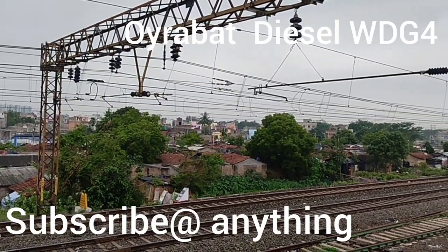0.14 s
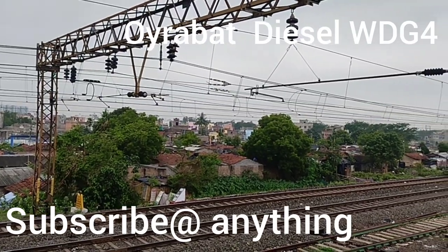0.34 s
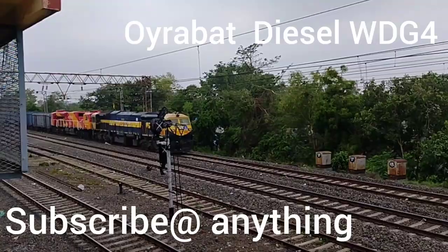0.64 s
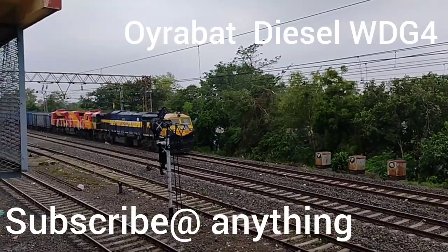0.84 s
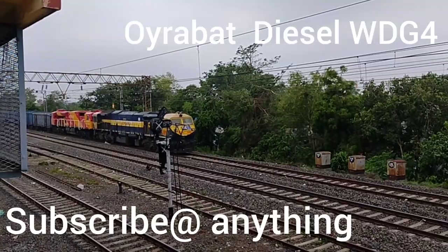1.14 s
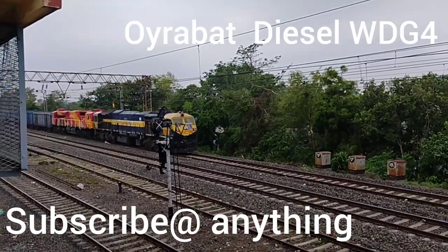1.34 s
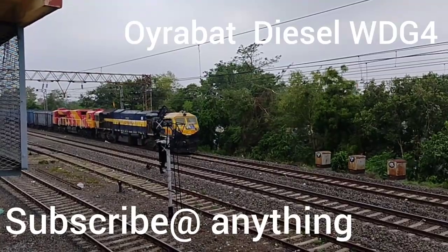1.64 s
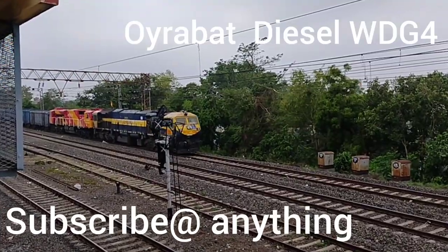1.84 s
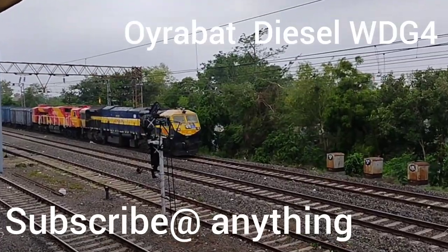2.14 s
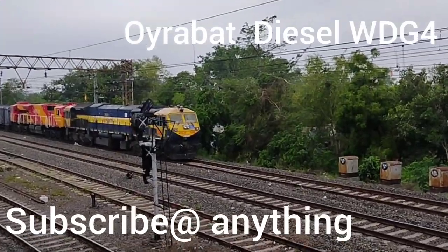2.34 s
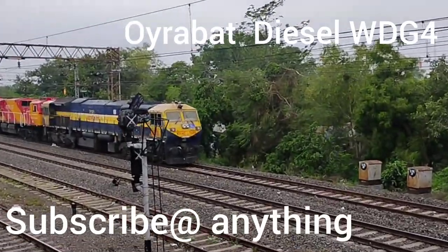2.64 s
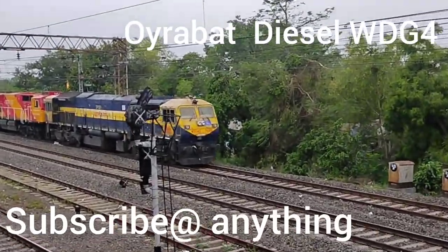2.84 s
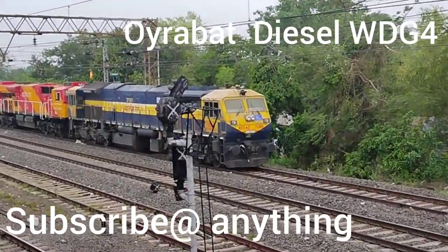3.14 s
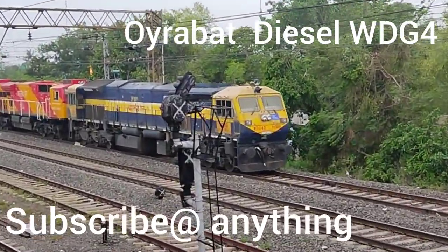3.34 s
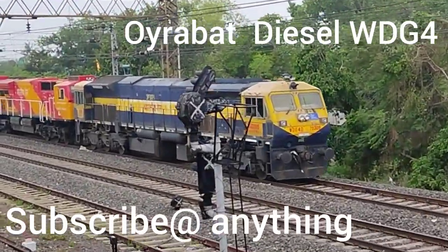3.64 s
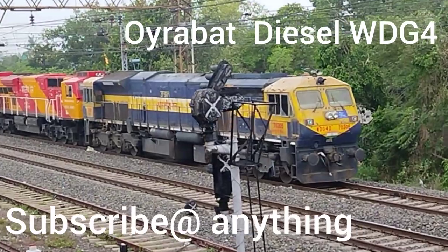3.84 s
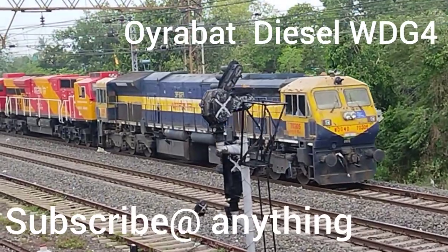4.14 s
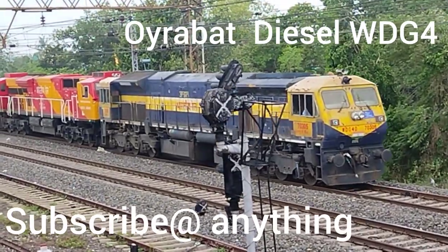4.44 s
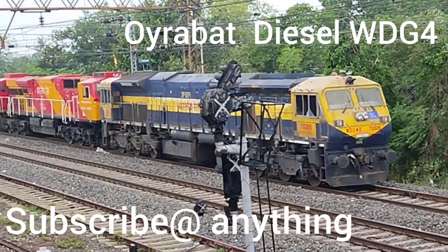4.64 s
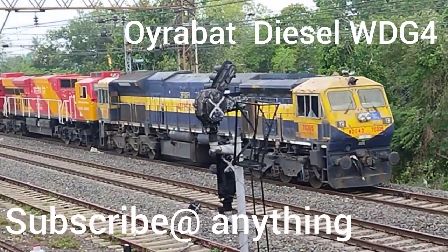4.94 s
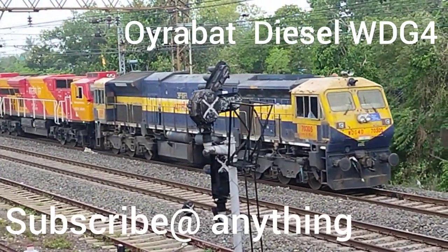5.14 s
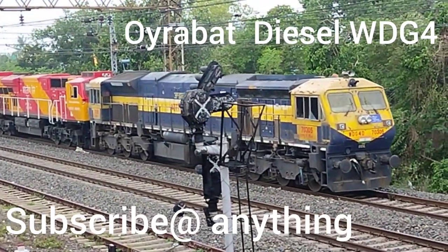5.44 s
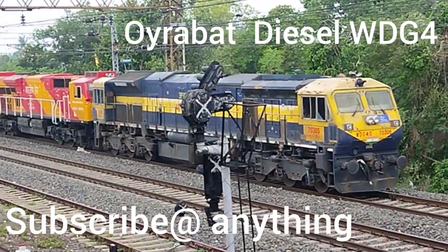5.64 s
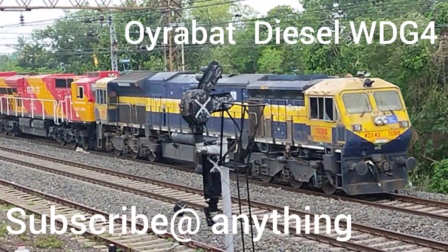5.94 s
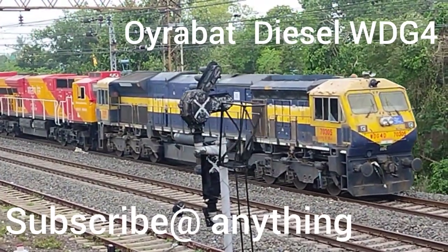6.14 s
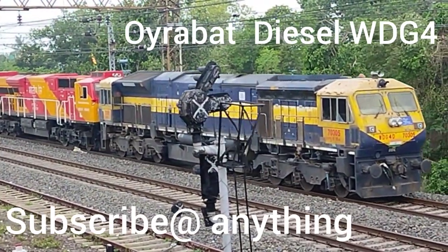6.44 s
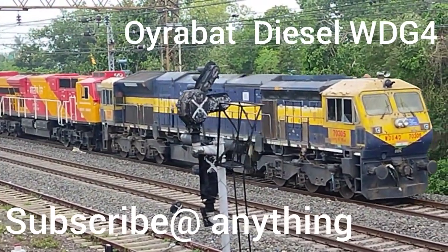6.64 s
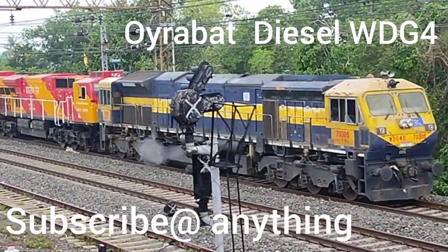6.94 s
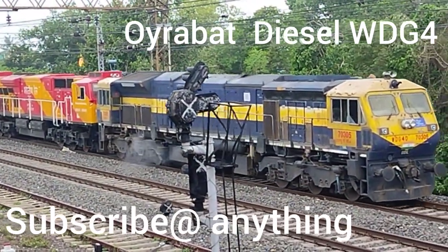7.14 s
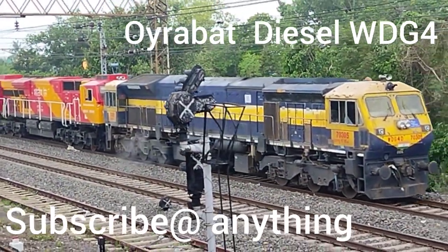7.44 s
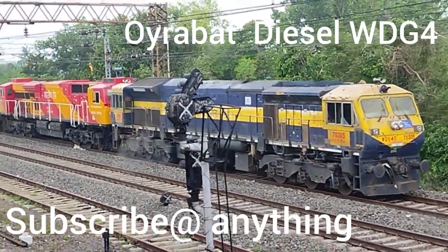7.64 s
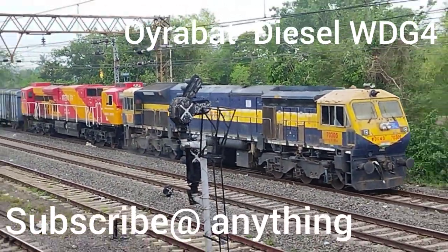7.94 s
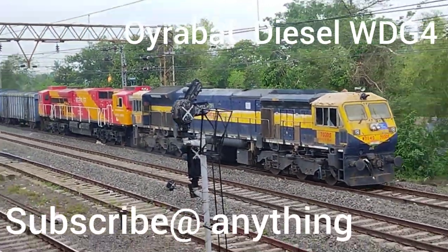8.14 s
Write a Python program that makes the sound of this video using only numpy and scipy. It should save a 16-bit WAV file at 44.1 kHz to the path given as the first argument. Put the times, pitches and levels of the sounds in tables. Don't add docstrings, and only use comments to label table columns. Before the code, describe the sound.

Outdoor railway yard captured on a phone in stereo. Cicadas ring, mostly to the right, then cut to a heavy diesel drone that quickly fades up. The steady pulsing rumble, rough exhaust, airy roar and piercing thin whistle grow slightly stronger as the train approaches. A mild air hiss comes early, ringing puffs and tiny peeps in the middle, and two bright strong blow-offs near the end.

```python
import sys
import numpy as np
from scipy import signal
from scipy.fft import rfft, irfft, next_fast_len
from scipy.io import wavfile
from scipy.ndimage import uniform_filter1d

SR = 44100
rng = np.random.default_rng(int(sys.argv[2]) if len(sys.argv) > 2 else 0)


def magnitude_from_level(level_db):
    exponent = np.asarray(level_db, float) / 20
    return 10 ** exponent


def waveform_to_disk(signal):
    frames = np.transpose(np.atleast_2d(signal))
    scaled = np.clip(frames, -1, 1) * 32767
    samples = np.round(scaled).astype(np.int16)
    wavfile.write(sys.argv[1], SR, samples)


N = 365181
SIZE = next_fast_len(N)
TIME, HZ = np.arange(N) / SR, np.fft.rfftfreq(SIZE, 1 / SR)
CUT_S, RETURN_S = 0.463, 0.55
MIDDLE_S = 4.5
FIRINGS, TEETH = 8, 79

# (time [s], pitch [Hz])
GEAR_MESH = [(0, 642.7), (3, 642.5), (6.5, 642.2), (7.5, 641.3), (8.3, 640.6)]
# (multiple of the engine cycle, level at MIDDLE_S [dB], change [dB/s])
EXHAUST_LINES = [(3, -52.5, -2.0), (4, -44.5, 0.0), (6, -50.0, -0.4), (7, -41.0, 0.9), (8, -30.5, 0.0),
                 (9, -38.5, -0.6), (10, -42.0, 1.0), (11, -39.0, 0.3), (12, -42.0, 0.7), (13, -30.5, 1.1),
                 (14, -33.5, -0.0), (15, -42.5, 0.6), (16, -35.5, 0.5), (17, -38.5, 1.9), (18, -48.0, -0.1),
                 (20, -52.0, 1.4), (21, -40.5, -0.1), (23, -51.5, 1.3), (24, -39.5, -0.4),
                 (25, -51.0, -0.5), (26, -53.5, -2.0), (27, -49.0, 0.5), (28, -58.5, -0.5),
                 (29, -48.5, -0.8), (30, -50.0, 2.0), (32, -50.0, -1.1), (34, -56.0, 1.2), (36, -52.5, 0.4)]
# (multiple of the engine cycle, level at MIDDLE_S [dB], change [dB/s])
GEAR_LINES = [(70, -52.5, 0.5), (79, -37.5, -0.0), (80, -46.5, -0.1), (81, -49.5, 2.0), (82, -50.5, -1.4),
              (83, -50.0, -0.9), (84, -51.5, 2.0), (85, -51.5, -0.6), (86, -50.5, 0.5), (87, -48.0, -0.0),
              (88, -53.0, -2.0), (89, -55.5, -2.0), (90, -55.0, -2.0), (91, -54.5, 1.5), (94, -51.5, -1.1),
              (96, -48.0, -1.3)]
# (time [s], nearness [dB], cooling air flow [dB], left over right [dB])
APPROACH = [(.6, -1, 0.5, 6), (1.1, -1, 1, 3), (2.5, 0, 0, 1.5), (3.3, 0.5, -1, 2), (4.1, 0.5, -.5, -3.5),
            (5.8, 0, -1, -4), (6.9, 1, 2, -6), (7.5, 1.5, 2.5, 0), (8.28, 2.5, 4, -5.5)]
# (frequency [Hz], level [dB])
RUMBLE_COLOUR = [(15, -2), (25, -8.5), (50, 2.5), (110, -7.5), (150, -9.5), (250, -5), (340, -7.5),
                 (480, -14.5), (600, -15), (900, -44.5)]
# (frequency [Hz], width [Hz], level [dB])
PANELS = [(683, 181, -0.5), (865, 47, -7.5), (1382, 315, -10), (2102, 350, -14)]
# (frequency [Hz], level [dB])
RUSH_COLOUR = [(300, 8.5), (1000, -13.5), (2600, 5.5), (3400, 3.5), (4500, 0.5), (6000, -3.5), (8000, -6.5),
               (10000, -31), (14000, -60)]
# (frequency [Hz], level [dB])
LEAK_COLOUR = [(5000, -22), (7000, 0.5), (8500, -1.5), (10000, -4.5), (12700, -18), (13600, -14),
               (14400, -2), (14800, -29), (15100, -44)]
# (frequency [Hz], width [Hz], level [dB])
FUZZY_TONES = [(20.9, 1, -48), (147, 0.85, -43), (295.6, 1.55, -52), (760, 3.9, -46.5), (919, 4.7, -52),
               (921, 6.2, -53.5), (1282, 24, -50), (1900, 23, -56.5), (3240, 60, -64), (4300, 89, -58),
               (3940, 26, -58), (14000, 300, -67)]
# (time [s], level [dB])
BLOWER_LOAD = [(.6, -60), (1.2, -55.5), (2, -55), (2.45, -63), (2.9, -68), (4.1, -63.5), (6.2, -59.5),
               (8.28, -57)]
# (time [s], pitch [Hz], level [dB])
WHEEL_TONE = [(3.8, 39.8, -60), (4.3, 41.74, -51), (5.5, 43.6, -44), (6.5, 47.4, -42), (7.5, 48.8, -60),
              (8.3, 51, -50)]
# (start [s], opening [s], hold [s], hiss [dB], nozzle ring [dB])
BLOW_OFFS = [
    (2.352, 0.04, 0.16, -43, -50),
    (3.714, .025, .04, -56, -42),
    (4.568, .02, 0.09, -58, -46),
    (6.815, 0.0073, .014, -38, -38.5),
    (6.852, .075, 0.1, -30, -27),
    (7.584, 0.23, 0.16, -31, -32.5),
]
# (frequency [Hz], level [dB])
JET_COLOUR = [(700, -36), (1500, -33), (2500, -3.5), (4000, -10), (6000, -3), (7500, 1.5), (9200, 5.5),
              (11000, 0), (13000, -4.5), (15500, -8), (15900, -14), (16200, -50)]
# (frequency [Hz], width [Hz], level [dB])
NOZZLE_RING = [(1390, 310, -8), (2100, 270, 1), (3650, 1900, -5.5), (5030, 470, -1.5), (7860, 1900, -5)]
# (start [s], length [s], first pitch [Hz], last pitch [Hz], level [dB])
SQUEAKS = [
    (3.656, .04, 4650, 4620, -58),
    (3.83, .027, 4680, 4680, -54),
    (4.35, .27, 4160, 4330, -59),
    (4.63, 0.12, 4700, 4740, -58),
    (5.193, .19, 4540, 4270, -62),
    (4.95, 0.5, 8450, 8570, -58),
]
# (start [s], length [s], first pitch [Hz], last pitch [Hz], level [dB])
NEAR_BIRD = [
    (3.875, .081, 4150, 4180, -47.5),
]
# (start [s], length [s], first pitch [Hz], last pitch [Hz], level [dB])
BREATHY_CALLS = [
    (3.03, .13, 3920, 3650, -53),
    (4.753, .51, 8800, 8650, -57),
]
# (frequency [Hz], width [Hz], level [dB])
CICADA_BODY = [(5280, 480, 0), (6450, 560, -4.5), (7300, 250, -15), (8670, 250, -23), (9620, 200, -22),
               (10550, 200, -27)]
# (frequency [Hz], level [dB])
YARD_COLOUR = [(12, -37), (20, -7), (60, 0.5), (96, -4.5), (129, -3.5), (321, -11.5), (360, -8.5),
               (542, -21.5), (1000, -20.5), (1100, -29), (1730, -25), (1940, -33.5), (4600, -41),
               (5980, -62), (10100, -120)]
# (frequency [Hz], level [dB])
INSECT_COLOUR = [(7000, -5.5), (8000, -4), (8700, -3), (9200, -14), (9700, -1), (10200, -12), (10700, -8),
                 (11500, -10.5), (13500, -11.5), (15300, -10), (15800, -12), (16200, -48)]
# (frequency [Hz], colour [dB], likeness [0-1], lag [radians])
PORT_DIFFERENCE = [(25, .3, .975, .02), (130, .5, .996, .05), (350, .8, .93, .12), (700, -2.6, .92, .25),
                   (1050, 2, .45, .4), (1350, -1, .72, .4), (2100, 8, .78, 1.1), (2800, 1, .45, 3),
                   (4000, 4, .3, 8), (5000, 1, .5, 6.6), (7600, 1, .5, 9.2), (9300, -13, .1, 11),
                   (12000, -9, .1, 14), (15000, -2, .3, 16)]
# (frequency [Hz], level [dB])
SILENT_BELOW_NEAR_TRAIN = [(2000, -110), (4300, -87), (8000, -86), (9000, -87), (13000, -85), (14500, -88),
                           (15100, -75), (16000, -76)]
# (frequency [Hz], level [dB])
SILENT_BELOW_NEAR_CICADAS = [(1500, -110), (2800, -81), (4700, -79), (5000, -82), (9000, -83), (12500, -81),
                             (14500, -83), (16000, -84)]


def evened(x):
    return x / np.sqrt(np.mean(x ** 2) + 1e-20)


def read(table, column, hz=HZ):
    rows = np.array(table)
    return np.interp(np.log(hz + 1), np.log(rows[:, 0] + 1), rows[:, column])


def curve(table, column):
    rows = np.array(table)
    return np.interp(TIME, rows[:, 0], rows[:, column])


def bands_db(peaks):
    return 20 * np.log10(sum(magnitude_from_level(db) / (1 + (2 * (HZ - hz) / width) ** 2) for hz, width, db in peaks))


def noise(shape_db):
    spectrum = rfft(rng.standard_normal((2, SIZE))) * magnitude_from_level(shape_db)
    return evened(irfft(spectrum, SIZE)[:, :N])


def drift(hz):
    z = rng.standard_normal((int(20 * N / SR), 2)) @ [1, 1j]
    f = np.arange(len(z)) * SR / N
    slow = irfft(z * np.exp(-(f / hz) ** 2) * (f > 0), N // 64 + 2)
    return evened(slow.repeat(64)[:N])


def resonate(x, hz, width):
    turn = np.exp(2j * np.pi * np.cumsum(hz * np.ones(x.shape[-1])) / SR)
    r = np.exp(-np.pi * width / SR)
    smooth = signal.lfilter([(1 - r) ** 2], [1, -2 * r, r * r], x / turn + 1e-18)
    return 2 * (turn * smooth).real


def drone(hz, db, waver_db):
    phase = 2 * np.pi * np.cumsum(hz) / SR
    return np.sqrt(2) * magnitude_from_level(db + waver_db * drift(hz=19)) * np.cos(phase)


def follow(db, near, air):
    return db + near * curve(APPROACH, column=1) + air * curve(APPROACH, column=2)


def settle():
    late_db, settle_s = -6, 0.03
    return magnitude_from_level(late_db * np.exp(-np.maximum(TIME - RETURN_S, 0) / settle_s))


def cycle():
    return 2 * np.pi * np.cumsum(curve(GEAR_MESH, column=1)) / TEETH / SR


def hum(lines, waver_db, spread):
    turn = cycle()
    since = TIME - MIDDLE_S
    slip_hz, in_step_s, twin_db, twin_change = 0.19, 1.46, -8.5, -0.55
    slip = 2 * np.pi * slip_hz * (TIME - in_step_s)
    beat = 1 + magnitude_from_level(twin_db + twin_change * since) * np.exp(-1j * slip)
    out = np.zeros(N, complex)
    for multiple, db, change in lines:
        phase = multiple * turn + spread * multiple ** 2
        line = magnitude_from_level(db + change * since) * np.exp(1j * phase)
        out += line * beat if multiple == FIRINGS else line
    out *= np.sqrt(2) * magnitude_from_level(waver_db * drift(hz=1.2))
    return np.array([out.real, out.imag])


def roar():
    firing = np.cos(FIRINGS * cycle())
    rumble_db = follow(-31.5, near=0.22, air=0.4) + 0.6 * drift(hz=5.2)
    clatter_db = follow(-33.5, near=1.06, air=0.01) + 0.35 * drift(hz=6.9)
    rush_db = follow(-41.5, near=0.01, air=1.26) + 0.85 * drift(hz=8)
    leak_db = follow(-47, near=-0.99, air=2.05) + 1.4 * drift(hz=3)
    rumble = noise(read(RUMBLE_COLOUR, column=1)) * magnitude_from_level(rumble_db)
    clatter = noise(bands_db(PANELS)) * (1 + 0.029 * firing) * magnitude_from_level(clatter_db)
    rush = noise(read(RUSH_COLOUR, column=1)) * (1 + 0.047 * firing) * magnitude_from_level(rush_db)
    leak = noise(read(LEAK_COLOUR, column=1)) * magnitude_from_level(leak_db)
    return rumble * settle() + clatter + rush + leak


def turbo():
    whistle_hz = 7197
    firing = FIRINGS * cycle()
    phase = 2 * np.pi * np.cumsum(whistle_hz + 5 * drift(hz=9)) / SR + 0.5 * np.sin(firing)
    swell = (1 - 0.1 * np.cos(firing)) * magnitude_from_level(2.1 * drift(hz=23))
    right_phase = phase + 2.74 + 0.87 * drift(hz=4.8)
    tone = swell * np.array([np.cos(phase), np.cos(right_phase)])
    skirt = evened(resonate(rng.standard_normal((2, N)), whistle_hz - 30, 200))
    side = curve(APPROACH, column=3) / 2
    level_db = follow(-42.5, near=0.54, air=0.62) + np.array([side, -side])
    return (evened(tone) + 0.9 * skirt) * magnitude_from_level(level_db)


def whines():
    hiss = rng.standard_normal((2, N))
    return sum(magnitude_from_level(db - 1) * evened(resonate(hiss, hz, width)) for hz, width, db in FUZZY_TONES)


def blower():
    return drone(4616 + 4 * drift(hz=1.43), curve(BLOWER_LOAD, column=1), waver_db=3.0)


def wheels():
    return drone(curve(WHEEL_TONE, column=1), curve(WHEEL_TONE, column=2), waver_db=2.5)


def valves():
    crack_db, shut_db = -15, -3.5
    tail_far, tail_near = 55, 127
    ring_fade_db = 4.8
    sizzle, ring = noise(read(JET_COLOUR, column=1)), noise(bands_db(NOZZLE_RING))
    out = np.zeros((2, N))
    for start, opening, hold, hiss_db, ring_db in BLOW_OFFS:
        t = TIME - start
        after = np.maximum(t - opening - hold, 0)
        tail = tail_far + (tail_near - tail_far) * start * SR / N
        flow_db = crack_db * np.clip(1 - t / opening, 0, 1)
        flow_db += shut_db * np.minimum(after / 0.025, 1) - tail * after
        fade_db = ring_fade_db * np.clip(t - opening, 0, hold) / max(opening, 0.05)
        jet = magnitude_from_level(hiss_db + 6.0) * sizzle + magnitude_from_level(ring_db - fade_db) * ring
        out += np.clip(t / 0.008, 0, 1) * magnitude_from_level(flow_db) * jet
    return out * magnitude_from_level(0.7 * drift(hz=30))


def chirps(rows, width_hz):
    out = np.zeros((2, N))
    for start, length, start_hz, end_hz, db in rows:
        count, first = round(length * SR), round(start * SR)
        glide = np.linspace(start_hz, end_hz, count)
        fuzz = evened(resonate(rng.standard_normal((2, count)), glide, width_hz))
        clear = 60 / width_hz * np.cos(2 * np.pi * np.cumsum(glide) / SR)
        swell = signal.windows.tukey(count, 0.4)
        out[:, first:first + count] += magnitude_from_level(db + 4.5) * evened(fuzz + clear) * swell
    return out


def cicada():
    rib_count, buckles_per_s = 8, 53.6
    slowing, sag = 0.04, 0.01
    count = round(CUT_S * SR)
    rate = buckles_per_s * (1 + 0.0033 * drift(hz=5.4)[:count])
    stroke = np.cumsum(rate) / SR % 1
    ribs = 2 * np.pi * rib_count * (stroke + slowing * stroke * (1 - stroke))
    snaps = evened(sum(np.cos(k * ribs) for k in range(9, 27)))
    others = 1.15 * rng.standard_normal((2, count))
    drive = snaps * (1 + 0.2 * np.cos(2 * np.pi * stroke)) + others
    pitch = 1 + sag * (0.5 - stroke)
    body = sum(magnitude_from_level(db) * resonate(drive, hz * pitch, width) for hz, width, db in CICADA_BODY)
    low_edge = signal.ellip(6, 1, 40, 4830, "high", fs=SR, output="sos")
    body = signal.sosfilt(low_edge, body)
    return magnitude_from_level(-34 + np.array([[-7.5], [4.5]])) * evened(body)


def yard():
    near, far = noise(read(YARD_COLOUR, column=1))
    town = magnitude_from_level(-37.5) * np.array([near + 0.4 * far, near - 0.3 * far])
    insects = magnitude_from_level(-47.5) * noise(read(INSECT_COLOUR, column=1))
    return (town + insects)[:, :round(CUT_S * SR)]


def ports(pair):
    direct, scattered = rfft(pair, SIZE)
    same = np.clip(read(PORT_DIFFERENCE, column=2), 0, 1)
    late = direct * np.exp(-1j * read(PORT_DIFFERENCE, column=3))
    right = same * late + np.sqrt(1 - same ** 2) * scattered
    return np.array([pair[0], irfft(right * magnitude_from_level(read(PORT_DIFFERENCE, column=1)), SIZE)[:N]])


def scene():
    low = (hum(EXHAUST_LINES, waver_db=0.35, spread=1.4) + wheels()) * settle()
    tones = hum(GEAR_LINES, waver_db=0.4, spread=1.3) + whines() + blower()
    birds = chirps(SQUEAKS, width_hz=38) + chirps(NEAR_BIRD, width_hz=120)
    birds += chirps(BREATHY_CALLS, width_hz=380)
    train = ports(low + tones + roar() + valves() + birds) + turbo()
    out = train * (TIME > CUT_S + 0.04)
    opening = cicada() + yard()
    out[:, :opening.shape[1]] += opening
    return out


def low_pass(x):
    return signal.sosfilt(signal.butter(12, 16000, fs=SR, output="sos"), x)


def record(dry):
    hz, t, z = signal.stft(dry, SR, "cosine", nperseg=2048, noverlap=1024)
    band_db = 10 * np.log10(abs(uniform_filter1d(abs(z) ** 2, size=7, axis=1)) + 1e-20)
    yard_db = read(SILENT_BELOW_NEAR_CICADAS, column=1, hz=hz)[:, None]
    train_db = read(SILENT_BELOW_NEAR_TRAIN, column=1, hz=hz)[:, None]
    kept = z * (band_db > np.where(t < CUT_S, yard_db, train_db))
    heard = signal.istft(kept, SR, "cosine", nperseg=2048, noverlap=1024)[1][:, :N]
    first_view = np.clip((CUT_S - TIME) / 0.0015, 0, 1)
    fade_s, fade_from = 0.27, 0.091
    second_view = np.clip(fade_from + (TIME - RETURN_S) / fade_s, 0, 1) * (TIME > RETURN_S)
    return low_pass(heard * (first_view + second_view))


dry = scene()
out = record(dry)
waveform_to_disk(out)
```